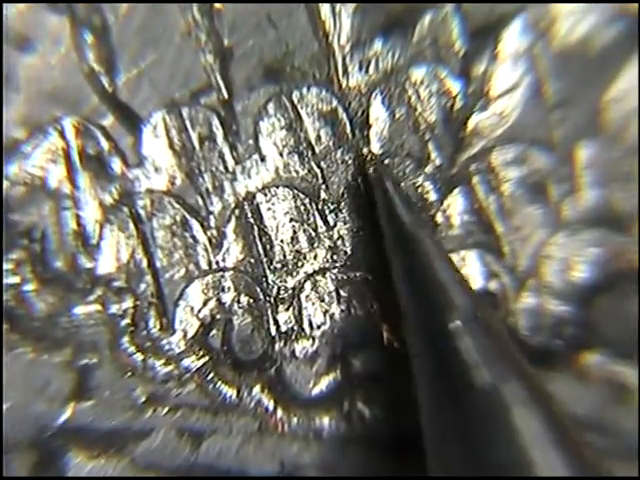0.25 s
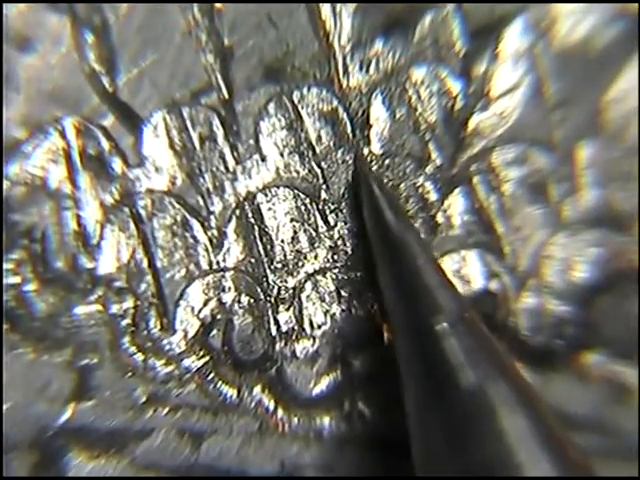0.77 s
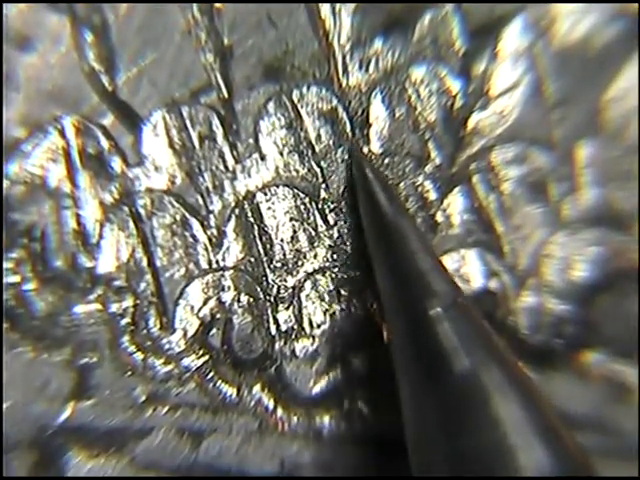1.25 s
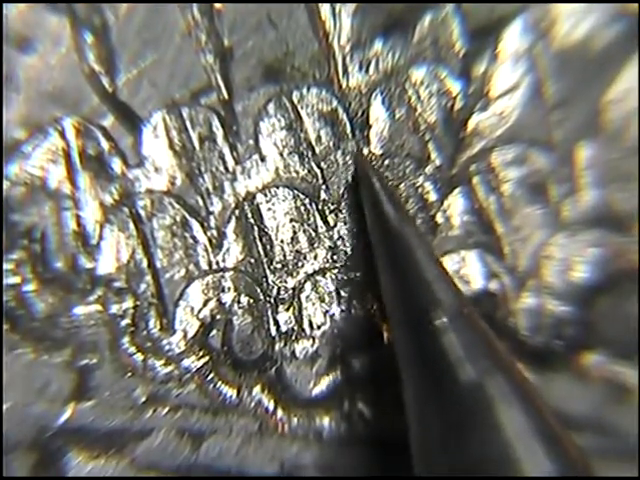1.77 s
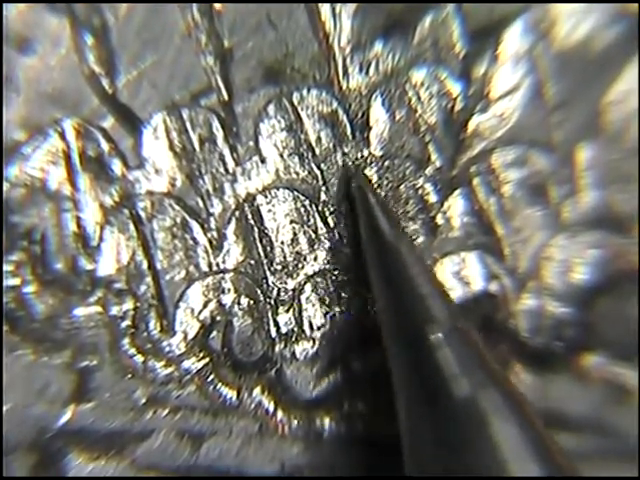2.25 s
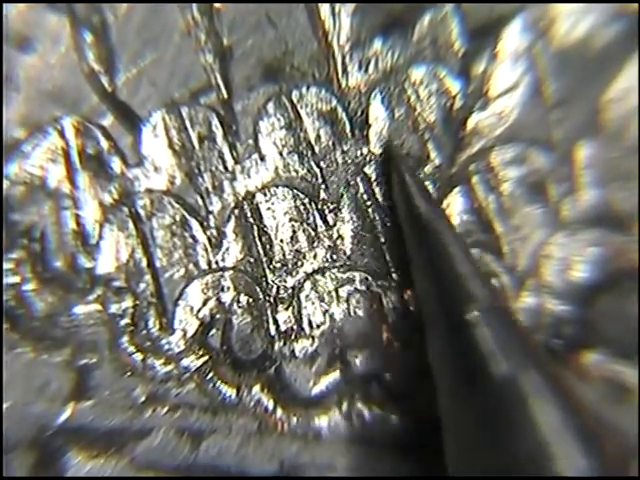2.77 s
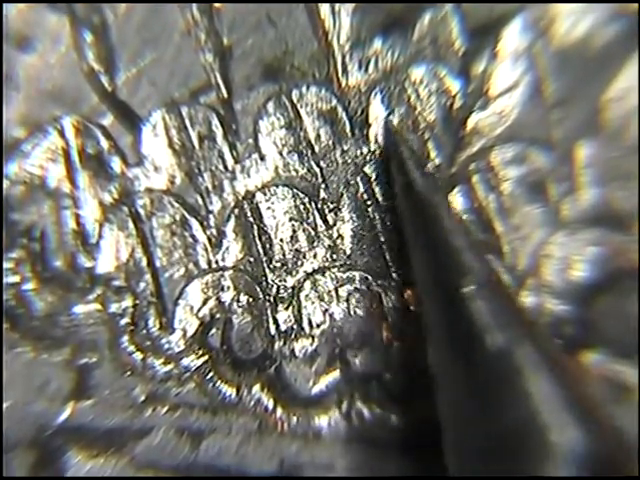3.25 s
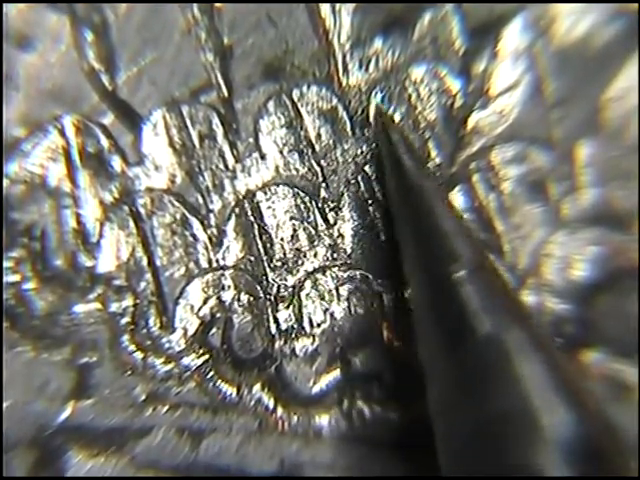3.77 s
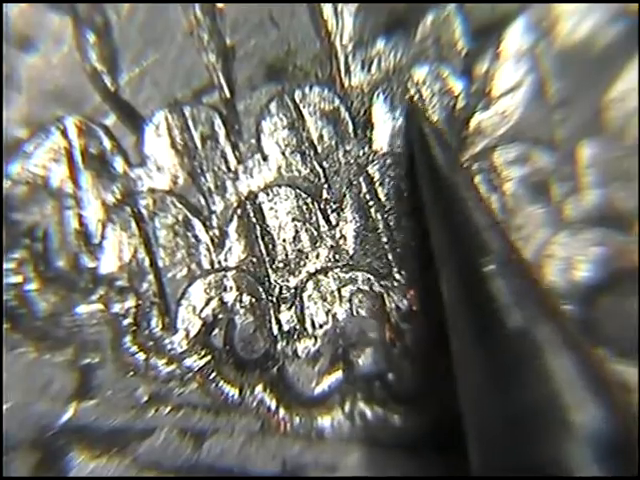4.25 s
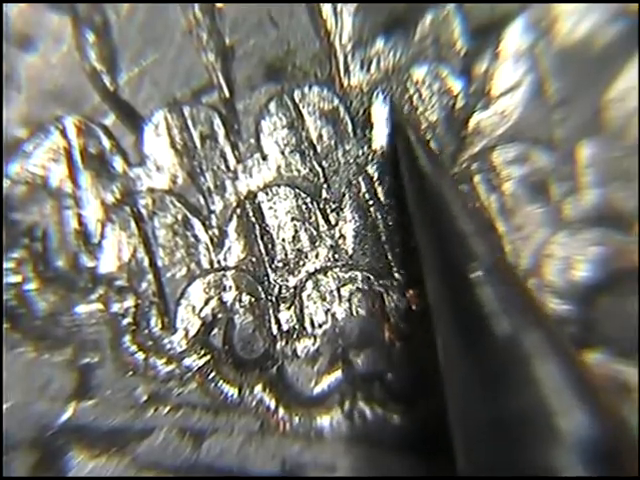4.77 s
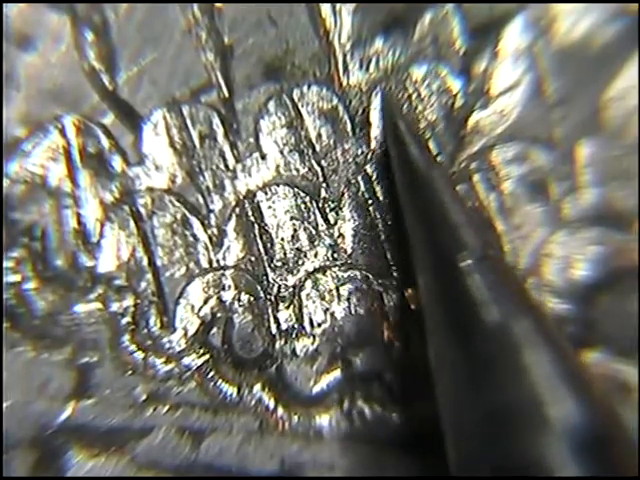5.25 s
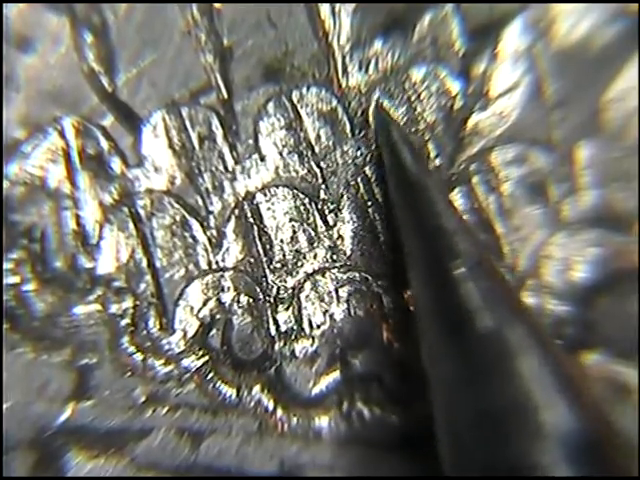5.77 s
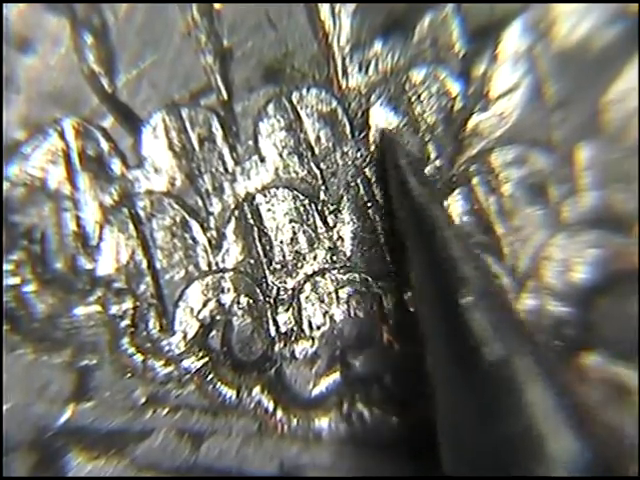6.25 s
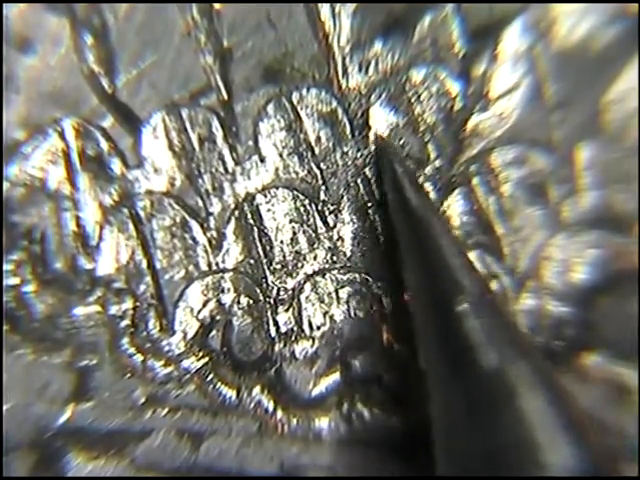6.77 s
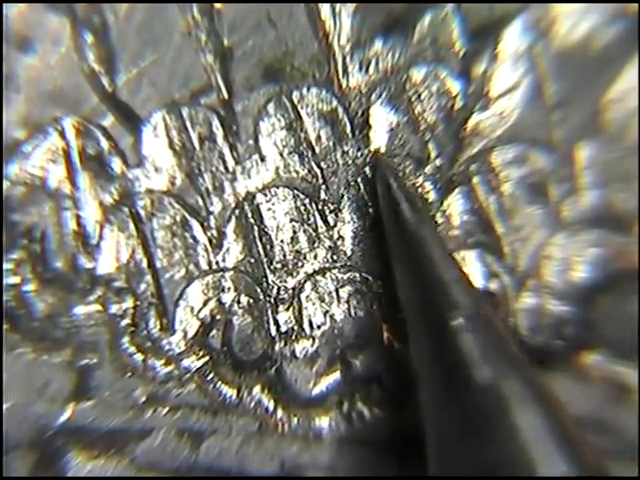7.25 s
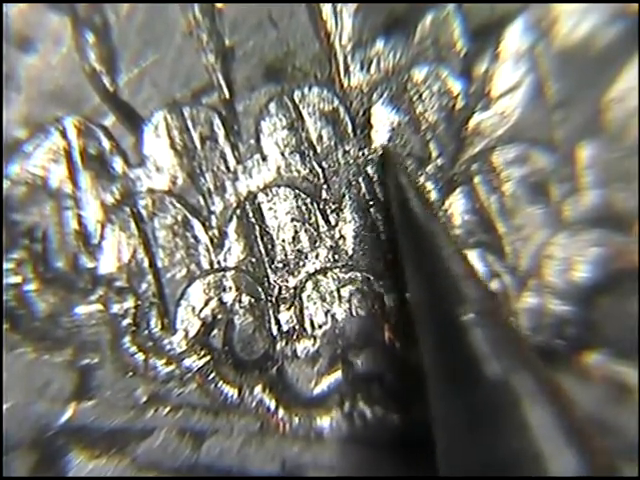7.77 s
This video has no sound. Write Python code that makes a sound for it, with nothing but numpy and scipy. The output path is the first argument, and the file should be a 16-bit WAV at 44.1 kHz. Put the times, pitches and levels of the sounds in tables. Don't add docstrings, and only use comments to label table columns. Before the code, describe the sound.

Constant shrill handpiece whine with bright air hiss, broken by brief gritty scrapes and chattering squeals as the spinning tip cuts hard metal.

```python
import sys
import numpy as np
from scipy import signal
from scipy.fft import rfft, irfft
from scipy.io import wavfile
from scipy.ndimage import uniform_filter1d

SR = 44100
rng = np.random.default_rng(int(sys.argv[2]) if len(sys.argv) > 2 else 0)


def wrap_up_sound(samples):
    columns = np.atleast_2d(samples).T
    tamed = np.clip(columns, -1, 1)
    steps = np.round(tamed * 32767).astype(np.int16)
    wavfile.write(sys.argv[1], SR, steps)


def level_to_linear(level):
    exponent = np.asarray(level, float) / 20
    return 10 ** exponent


N = 352781
FFT_N = N + 19

# time in seconds, change in dB.
SIDE_LOAD = [
    (0, 4.5),
    (2.7, 5.5),
    (3.1, -23),
    (4.6, -3),
    (5.6, -3),
    (7, 2.5),
    (7.6, -1),
    (8, 7),
]


def unit(x):
    return x / np.sqrt(np.mean(x ** 2) + 1e-20)


def in_time(rows):
    seconds, *columns = np.transpose(rows)
    return [np.interp(np.arange(N) / SR, seconds, column) for column in columns]


def drift(rate_hz):
    r = np.exp(-80 * np.pi * rate_hz / SR)
    slow = signal.lfilter([1], [1, -2 * r, r * r], rng.standard_normal(N // 40 + 2002))[2000:]
    return np.interp(np.arange(N) / 40, np.arange(len(slow)), unit(slow - slow.mean()))


def strokes(rows, rise_db_per_s, fall_db_per_s):
    t = np.arange(N) / SR
    level_db = np.full(N, -90.)
    for start, length, first_db, last_db in rows:
        slope_db = np.interp(t, [start, start + length], [first_db, last_db])
        rise_db = rise_db_per_s * np.maximum(start - t, 0)
        fall_db = fall_db_per_s * np.maximum(t - start - length, 0)
        level_db = np.maximum(level_db, slope_db - rise_db - fall_db)
    return level_to_linear(uniform_filter1d(level_db, size=200))


def paired_noise(spectrum, gate):
    # frequency in Hz, likeness of the channels 0-1, left-right dB, right phase in radians.
    capsules = np.array([(60, 0.2, 3, 0.15), (590, 0.98, -6.5, -0.61), (1790, 0.92, -4, -0.25),
                         (2920, 0.91, -3.5, 0.63), (5040, 0.94, -7, 0.31), (6850, 0, -0.5, -1.15),
                         (9200, 0.6, -4.5, -0.21), (10900, 0.5, -10.5, -1), (13000, 0, -1.5, -2),
                         (15000, 0, -16, -.3)])
    log_hz = np.log(np.maximum(np.fft.rfftfreq(FFT_N, 1 / SR), 1))
    alike, pan_db, phase = [np.interp(log_hz, np.log(capsules[:, 0]), c) for c in capsules.T[1:]]
    hz, db = np.transpose(spectrum)
    colour = level_to_linear(np.interp(log_hz, np.log(hz), db, left=-150, right=-150))
    gated = rng.standard_normal((2, FFT_N)) * np.pad(gate, (0, FFT_N - N), "edge")
    mid, side = rfft(gated) * colour
    alike = np.clip(alike, 0, 1)
    mid, side = np.sqrt(1 + alike) * mid, np.sqrt(1 - alike) * side
    left = (mid + side) * level_to_linear(pan_db / 2)
    right = (mid - side) * level_to_linear(-pan_db / 2) * np.exp(1j * phase)
    return unit(irfft([left, right], FFT_N)[:, :N])


def lines(table, turns, flutter_db, slip_rad, scatter=1, pace_hz=5.5):
    # time in seconds, beats so far.
    front_beats = [(0, .1), (1.021, 8.5), (1.175, 9.5), (1.675, 13.5), (2.108, 16.5), (2.73, 21.5),
                   (3.02, 23.5), (3.48, 26.5), (4.26, 32.5), (4.737, 36.5), (5.165, 39.5), (5.54, 42.5),
                   (5.81, 44.5), (6.81, 52.5), (6.955, 53.5), (7.335, 56.5), (7.5, 57.5), (8, 61.2)]
    rear_beats = [(0, -.27), (1, 3.78), (2.5, 8.7), (5.5, 21.7), (7, 27.2), (8, 30.4)]
    throbs = {12.883: (0, 1, .55, 0), 13.711: (0, 1, .5, 0), 14.867: (0, 1, .5, .66),
              12.039: (0, 1, .35, .85), 14.055: (0, 1, .25, .47), 11.652: (1, 1, .75, 0),
              13.305: (1, 1, .55, .3), 10.805: (1, 1, .5, .5), 17.492: (1, 3, .5, .2)}
    sagging = {13.195: 1, 8.59: .25, 21.824: .35, 12.883: .05, 10.41: .05, 12.41: .04, 13.883: .08, 17.176:
               .05}
    beats = in_time(front_beats) + in_time(rear_beats)
    load_db = in_time(SIDE_LOAD)[0]
    out = np.zeros((2, N))
    for multiple, level_db, pan_db, phase in table:
        cycles = (multiple * turns + scatter * rng.random()) % 1
        angle = (2 * np.pi * cycles + slip_rad * drift(pace_hz)).astype("f4")
        share = np.sqrt(2 / (1 + level_to_linear(-2 * np.array([pan_db, -pan_db]))))
        height = np.sqrt(2) * level_to_linear(level_db) * (1 + flutter_db * np.log(10) / 20 * drift(pace_hz))
        if multiple in throbs:
            ball_set, per_beat, second, start = throbs[multiple]
            throb = np.cos(2 * np.pi * (per_beat * beats[ball_set] + start))
            height = height * np.sqrt(1 + 2 * second / (1 + second ** 2) * throb)
        if multiple in sagging:
            height = height * level_to_linear(sagging[multiple] * load_db)
        out[0] += share[0] * height * np.sin(angle)
        out[1] += share[1] * height * np.sin(angle + np.float32(phase))
    return out


def spinning_tool(turns):
    # multiple of shaft speed, rms level in dB, left-
    # right dB, right phase in radians.
    armature = [(1.578, -57.0, -4.0, -0.4), (2.0, -50.0, -2.0, -0.3), (3.0, -45.0, 0.0, 0.3),
                (8.59, -37.0, -6.0, -0.1), (9.59, -39.0, -6.0, -0.3), (9.688, -38.0, -7.0, -0.4),
                (10.0, -23.7, -7.0, -0.7), (10.41, -28.6, -7.0, -0.5), (10.805, -34.0, -8.0, -0.5),
                (11.254, -39.0, -7.0, -1.1), (11.465, -40.0, -3.0, -0.6), (11.566, -39.0, -5.0, -0.7),
                (11.652, -31.0, -4.0, -0.9), (11.816, -39.0, -4.0, -1.0), (11.883, -39.0, -3.0, -0.9),
                (12.039, -40.0, -6.0, -1.2), (12.41, -27.4, -2.0, -1.2), (12.453, -39.0, -2.0, -1.2),
                (12.496, -39.0, -2.0, -1.2), (12.883, -21.5, -1, -1.1), (13.195, -34.0, -1.0, -0.8),
                (13.305, -35.0, 0.0, -0.9), (13.629, -38.0, -1.0, -0.7), (13.711, -37.0, -2.0, -0.8),
                (13.883, -34.0, 2.0, -0.8), (14.055, -40.0, 2.0, -0.7), (14.867, -36.0, -6.0, -0.8),
                (4, -50, -1, 0), (5, -44.5, -1, -.3), (6.04, -46, -1, 0), (6.383, -45, -2, -.3),
                   (7, -46, 0, 0), (7.242, -46, -1, -.1), (13.508, -42, -1, -.8), (14.023, -41, 0, -.4),
                   (14.289, -42, -2, -.3), (14.473, -41, -5, -.4), (14.664, -43, -5, -.6),
                   (26.195, -47, -7, -.6), (27.5, -46, -17, 0)]
    bearings = [(16.117, -31.0, 1.0, -0.9), (16.418, -42.0, 0.0, -1.1), (16.672, -36.0, 0.0, -0.4),
                (16.75, -42.0, -3.0, -0.7), (16.871, -43.0, -3.0, -0.4), (17.176, -27.0, -4.0, -0.8),
                (17.273, -41.0, -3.0, -0.9), (17.492, -32.0, -4.0, -0.6), (17.547, -43.0, -5.0, -0.7),
                (18.07, -43.0, -5.0, -0.9), (18.117, -30.0, -4.0, -1.3), (19.25, -44.0, -7.0, -0.7),
                (20.094, -45.0, -6.0, -1.0), (21.0, -45.0, -4.0, -0.8), (21.473, -31.6, -4.0, -1.5),
                (21.824, -36.0, -1.0, -1.4), (21.898, -44.0, 0.0, -1.7), (22.059, -38.0, -10.0, -1.4),
                (22.113, -38.0, -7.0, -1.6), (22.691, -46.0, -7.0, -1.9), (22.902, -42.0, -5.0, -2.4),
                (23.824, -38.5, -1.0, -1.1), (25.766, -40.5, -4.0, -0.1)]
    slow_orbit = [
        (1, -34.0, -5, -.4),
        (.573, -57.0, -3, -.2),
        (.422, -65.0, -3, -.4),
    ]
    tones = lines(armature, turns, flutter_db=0.67, slip_rad=0.021)
    tones += lines(bearings, turns, flutter_db=1.0, slip_rad=0.11)
    return level_to_linear(0.55) * tones + lines(slow_orbit, turns, flutter_db=0.94, slip_rad=0.015)


def cooling_air(turns):
    # frequency in Hz, level in dB per Hz.
    body = [(670, -20.5), (760, -18), (1000, -21), (1600, -12.5), (1850, -17.5), (2500, -10.5), (3450, -12),
            (3750, -9), (4700, -5.5), (5500, -4.5), (6050, -2), (6500, -5), (7050, -5), (7700, -2.5),
            (8300, -6)]
    edge = [(7900, -35), (8400, -5), (8900, -8.5), (9600, -8.5), (10100, -6.5), (11000, -7.5), (11600, -9),
            (12400, -10.5), (13300, -4.5), (13900, -18), (14600, -16), (15100, -17), (15700, -5.5),
            (16000, -42)]
    gate = (1 + 0.17 * np.sin(2 * np.pi * turns)) * level_to_linear(0.57 * drift(3.1))
    air = paired_noise(body, gate) + level_to_linear(-3.5) * paired_noise(edge, gate)
    return level_to_linear(-21.5 + 0.043 * in_time(SIDE_LOAD)[0]) * air


def bur_pressure():
    # start in seconds, length in seconds, dB at start, dB at end.
    bites = [(1.0, .15, -33, -34), (1.15, 0.15, -30, -30), (1.72, 0.26, -32, -26.5),
             (1.951, 0.087, -27, -32), (2.765, 0.093, -25, -24), (2.849, .035, -20.5, -23.5),
             (2.883, .135, -23.5, -27.5), (3.018, 0.25, -26, -22), (3.278, 0.33, -23, -23),
             (3.567, 0.19, -23.5, -24), (3.766, 0.084, -25, -23), (3.856, .06, -21.5, -21),
             (3.916, 0.18, -24, -23), (4.091, 0.035, -25, -31), (4.171, .03, -33, -22),
             (4.2, .04, -23, -22), (4.24, .314, -21.5, -26), (4.735, 0.21, -23.5, -23.5),
             (5.034, 0.49, -25.5, -24), (5.498, 0.16, -26.5, -24), (5.672, 0.15, -25.5, -23.5),
             (5.807, 0.057, -21, -26.5), (6.322, 0.12, -23, -21), (6.425, 0.068, -21.5, -24),
             (6.49, .03, -25.5, -30), (6.768, .042, -26, -23.5), (6.81, .05, -23.5, -29),
             (7.165, 0.04, -32, -28), (7.323, .045, -31, -24), (7.368, 0.095, -24, -33),
             (7.575, 0.027, -35, -38), (7.762, .08, -27.5, -30.5)]
    return strokes(bites, rise_db_per_s=2000, fall_db_per_s=1200)


def bur_contact(turns):
    touch = np.exp(.7 * np.cos(2 * np.pi * turns))
    cage = 1 + .6 * np.cos(2 * np.pi * .422 * turns)
    return touch * cage * level_to_linear(1.1 * drift(60.0))


def coin_bite(turns, pressed, contact):
    # multiple of shaft speed, rms dB, left-right dB, right phase in radians.
    loaded_orders = [(0.422, -59.5, -3.0, -0.5), (1.422, -60.0, -6.0, -0.8), (1.578, -54.5, -3.0, -0.5),
                     (3.578, -53.0, 0.0, -0.0), (4.0, -39.6, -2.0, -0.4), (4.422, -43.5, -2.0, -1.1),
                     (4.578, -44.0, -5.0, -0.5), (5.0, -32.8, -2.0, -1.2), (5.156, -43.5, -2.0, -0.9),
                     (5.422, -34.3, 5.0, -0.6), (5.578, -43.0, 1.0, -0.2), (6.422, -44.0, -2.0, -0.1),
                     (6.578, -43.0, -1.0, -0.2), (7.004, -45.0, -1.0, -0.2)]
    # frequency in Hz, level in dB per Hz.
    rasp = [(400, -30), (1500, -25), (2300, -17), (2700, -4.5), (3100, -6), (3260, 10), (3390, 5),
            (3520, 5), (3900, -13), (4500, -29)]
    full_bite_db, orders_growth = -24, .45
    growth = (pressed / level_to_linear(full_bite_db)) ** orders_growth
    orders = lines(loaded_orders, turns, flutter_db=2.0, slip_rad=0.26, scatter=0, pace_hz=17)
    bite = level_to_linear(28.0) * growth * orders + level_to_linear(-2.5) * paired_noise(rasp, contact)
    return pressed * level_to_linear(0.6 * drift(27.0)) * bite


def shank_squeal(turns, contact):
    # start in seconds, length in seconds, dB at start, dB at end.
    squeals = [(0.998, 0.24, -28, -26), (1.2, 0.1, -22.5, -27), (1.7, 0.1, -27, -26.5),
               (1.791, 0.1, -23.5, -31), (1.89, 0.06, -35, -27), (1.951, 0.064, -24, -23),
               (2.757, 0.032, -18.5, -24), (2.834, 0.03, -24.5, -30.0), (2.893, 0.02, -32, -23),
               (2.913, 0.14, -19.5, -21.5), (3.108, 0.028, -32, -27), (3.138, 0.045, -35, -27.5),
               (3.183, 0.022, -18, -22), (3.208, 0.11, -35, -20), (3.357, 0.025, -19, -30),
               (3.382, 0.015, -26, -18), (3.397, 0.047, -19, -28), (3.492, 0.14, -29, -25.0),
               (3.667, 0.047, -24, -22), (3.722, 0.13, -27, -29), (3.851, 0.03, -23.0, -21.0),
               (3.881, 0.054, -18, -36), (3.981, 0.05, -27.5, -38), (4.031, 0.05, -26.0, -20),
               (4.081, 0.059, -22.0, -31.0), (4.176, 0.105, -23, -22), (4.28, 0.03, -23, -26.0),
               (4.34, 0.04, -29, -24), (4.415, 0.02, -29, -36), (4.732, 0.037, -28, -22),
               (4.769, 0.11, -18, -29), (4.919, 0.015, -19, -27.0), (4.94, 0.09, -36, -36),
               (5.034, 0.027, -31.0, -26.5), (5.128, 0.026, -26, -22), (5.158, 0.022, -23, -23.5),
               (5.243, 0.026, -28.5, -19), (5.273, 0.056, -34, -26.5), (5.368, 0.055, -32.5, -19),
               (5.423, 0.25, -20.0, -29), (5.707, 0.075, -28, -36), (5.817, 0.022, -25.0, -19),
               (6.324, 0.2, -25, -26), (6.772, 0.072, -22.5, -18), (6.839, 0.027, -15, -19),
               (7.16, 0.049, -30, -25), (7.315, 0.065, -24.5, -17), (7.38, 0.1, -13.5, -32),
               (7.575, 0.033, -33, -36), (7.76, 0.083, -24.5, -25.5)]
    shank_hz, width_hz = 3385, 200
    r = np.exp(-np.pi * width_hz / SR)
    w = 2 * np.pi * shank_hz / SR
    grit = contact * rng.standard_normal(N)
    chatter = unit(signal.lfilter([1, 0, -1], [1, -2 * r * np.cos(w), r * r], grit))
    sixth = lines([(6, 0, -2, -.3)], turns, flutter_db=.3, slip_rad=.3, scatter=0) * level_to_linear(1.0 * drift(90.0))
    squeal = sixth + level_to_linear(-12.5) * chatter * level_to_linear([[-1.1], [.9]])
    return strokes(squeals, rise_db_per_s=2600, fall_db_per_s=1800) * squeal


def bench_drumming(pressed):
    # frequency in Hz, level in dB per Hz.
    bench_tone = [(148, -38), (165, -1), (195, -2), (215, -16)]
    drumming = level_to_linear(-71.5) + level_to_linear(-38) * uniform_filter1d(pressed, size=2000)
    return drumming * level_to_linear(2 * drift(7.6)) * paired_noise(bench_tone, np.ones(N))


def workshop_hum():
    # frequency in Hz, level in dB per Hz.
    hum = [(18, -45), (50, -3.5), (80, -13), (120, -40), (190, -19), (225, -11), (400, -5), (520, -11.5),
           (620, -15), (660, -8)]
    return level_to_linear(-53.0) * paired_noise(hum, level_to_linear(1.0 * drift(2.2)))


def scene():
    # time in seconds, shaft speed in turns per second.
    shaft = [(0, 564.6), (.75, 562.9), (1.5, 563.9), (1.8, 563.9), (3, 565.85), (3.75, 566.6),
             (4.25, 566.1), (5, 564.8), (5.75, 563.7), (6.5, 562.3), (7, 562.85), (7.75, 562.1),
             (8, 562.07)]
    # time in seconds, left-right dB.
    lean = [(0, -.2), (.75, -.4), (1.5, 0), (3, -0.5), (5, -.2), (6.5, -.3), (8, -0.3)]
    turns = np.cumsum(in_time(shaft)[0]) / SR
    pressed = bur_pressure()
    contact = bur_contact(turns)
    tool = spinning_tool(turns) + cooling_air(turns)
    tool += coin_bite(turns, pressed, contact) + shank_squeal(turns, contact)
    tool *= level_to_linear(in_time(lean)[0] * [[.5], [-.5]])
    return tool + bench_drumming(pressed) + workshop_hum()


def band_limit(x):
    return signal.sosfilt(signal.butter(12, 15890, fs=SR, output="sos"), x)


def record(dry):
    openings = [.06, .12, .17, .32, .77, 1.12, 1.17, 1.42, 1.62, 1.86, 2.2, 2.49, 2.62, 3.05, 3.49, 4.2,
                4.48, 4.72, 4.86, 5.52, 5.8, 6.1, 6.66, 6.96, 7.54, 7.62, 7.75, 7.94]
    top_band_hz, open_s, offset = 15180, .028, -.0313
    passing = np.zeros(N)
    for start in openings:
        passing[int(start * SR):int((start + open_s) * SR)] = 1
    spectrum = rfft(np.clip(dry + offset, -1, 1), FFT_N)
    above = np.fft.rfftfreq(FFT_N, 1 / SR) > top_band_hz
    top = irfft(spectrum * above, FFT_N)[:, :N]
    shut = 1 - uniform_filter1d(passing, size=400)
    mix = irfft(spectrum, FFT_N)[:, :N] - top * shut
    return band_limit(mix)


dry = scene()
out = record(dry)
wrap_up_sound(out)
```